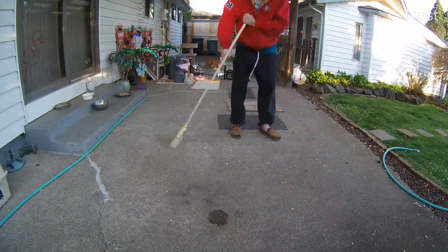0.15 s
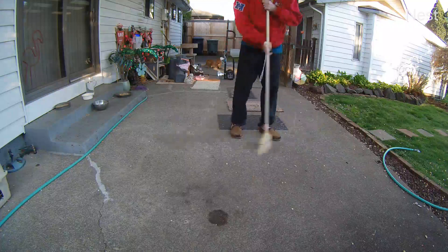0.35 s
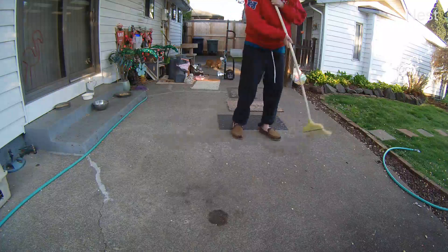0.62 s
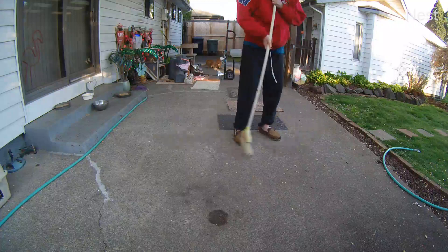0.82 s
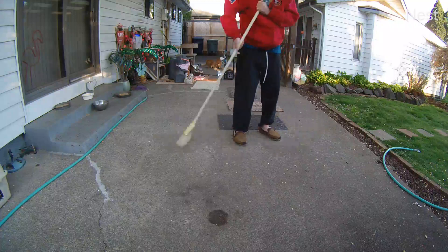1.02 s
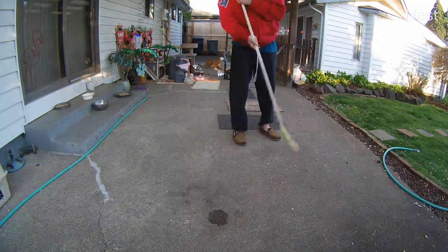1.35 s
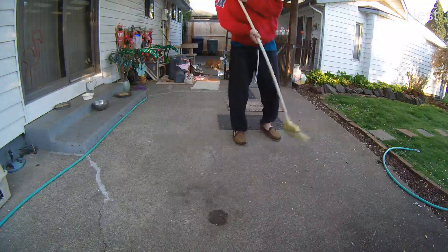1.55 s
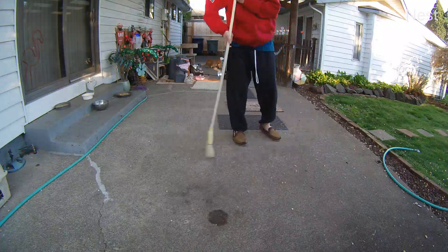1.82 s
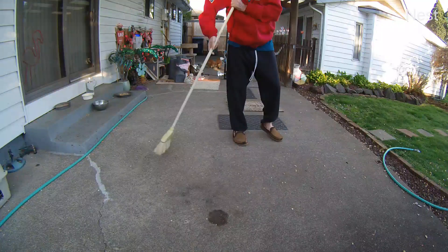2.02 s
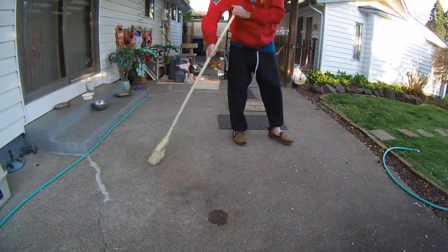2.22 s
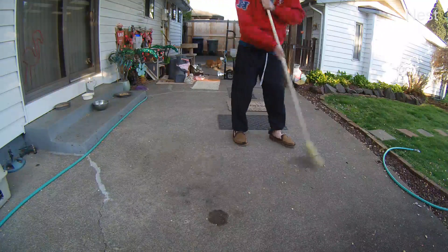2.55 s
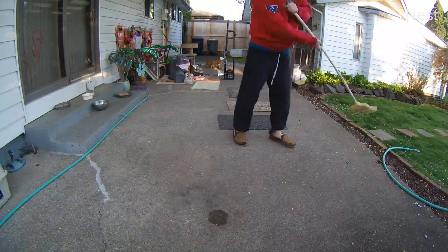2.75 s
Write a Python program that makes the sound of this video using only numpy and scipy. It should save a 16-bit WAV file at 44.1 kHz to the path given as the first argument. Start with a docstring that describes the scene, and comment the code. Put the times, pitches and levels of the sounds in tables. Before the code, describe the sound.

Three raspy broom strokes brush over concrete outdoors, with faint shoe scuffs and ticking grit.

```python
"""Straw broom on a concrete patio

Three strokes, a few metres away. Straws catch and slip on the rough slab, ringing as they flick.
Shoes scuff between strokes and loose grit ticks. House walls add a short echo.
Behind: quiet outdoor air and two faint, hoarse distant calls."""
import sys
import numpy as np
from scipy import signal
from scipy.fft import rfft, irfft
from scipy.io import wavfile
from scipy.ndimage import map_coordinates

SR = 44100
rng = np.random.default_rng(int(sys.argv[2]) if len(sys.argv) > 2 else 0)


def transcribe(signal):
    """Save signal, clipped to [-1, 1], as a 16-bit WAV file at the path in sys.argv[1]."""
    frames = np.atleast_2d(signal).T
    limited = np.clip(frames, -1, 1)
    pcm = np.round(limited * 32767).astype(np.int16)
    wavfile.write(sys.argv[1], SR, pcm)


N = 127890

# Broom strokes. Each row: start, landing, rise and hold in s, first touch in dB below full, full level
# in dB, release in dB/s, body trim in dB, straw ring trim in dB, flex in Hz, hollow ring in dB,
# fine hiss in dB.
STROKES = [(0.189, 0.018, 0.15, 0.11, 14, -29, 245, 2.5, 4, 5400, -18.5, -18),
           (1.249, 0.013, 0.053, 0.08, 20, -33, 335, 6, 2, 5200, -24.5, -26),
           (2.325, 0.035, 0.12, 0.16, 20, -30, 286, 4, 4.5, 5160, -19.5, -21)]

CATCHES_PER_S, CATCH_SPREAD_DB = 9000, 3
JUDDER_HZ, JUDDER_DB = 75.47, 1.01
RING_DB, RING_SCATTER_DB, RING_WANDER_HZ = -1, 1, 9.7
FLEX_DB, FLEX_WIDTH_HZ = -22, 2400
FINE_HZ, FINE_WIDTH_HZ = 7450, 800
BODY_DB, HOLLOW_HZ, HOLLOW_WIDTH_HZ = -16.5, 1064, 58
DENSE_T60_S, DENSE_DB, DENSE_LOW_HZ, DENSE_HIGH_HZ = 0.17, 10, 2000, 8800
SAND_DB, SAND_GROWTH_DB_PER_S = -68.5, 1.5
CALL_JITTER, CALL_JITTER_HZ, CALL_OVERTONE_DB = 0.045, 170, -16
YARD_DB, YARD_T60_S = -13.5, 0.5
AIR_DB, AIR_WAVER_DB = -62, 1.3


def stroke(t, start_s, landing_s, rise_s, hold_s, touch_db, full_db, release_db_per_s,
           body_db, ring_db, flex_hz, hollow_db, fine_db):
    """The broom lands, presses harder, snags and lifts; its force scales tip and body noise."""
    # Straws snag and spring free. Each row: centre in s, half-width in s, force change in dB.
    snags = [(1.332, 0.017, 3), (1.377, 0.0035, 4.5), (2.451, 0.0031, -7), (2.605, 0.028, 1)]
    age = t - start_s
    press_db = -touch_db * (1 - np.clip(age / rise_s, 0, 1)) ** 1.26
    lift_db = -release_db_per_s * np.maximum(age - rise_s - hold_s, 0)
    snag_db = sum(db * np.exp(-((t - at_s) / width_s) ** 2) for at_s, width_s, db in snags)
    force_db = full_db + press_db + lift_db + snag_db + JUDDER_DB * walk(JUDDER_HZ)
    force = np.clip(age / landing_s, 0, 1) * undb(force_db)
    return force * (straw_tips(t, ring_db, flex_hz, fine_db) + broom_body(body_db, hollow_db))


def straw_tips(t, ring_db, flex_hz, fine_db):
    """Tips catch and slip on the slab: rasp, flex, ring and fine hiss; rms 1."""
    # Rasp spectrum. Each row: frequency in Hz, relative level in dB.
    rasp_spectrum = [(120, -43), (380, -44), (600, -17), (1400, -9), (2050, 7), (2400, 1.5), (3000, -3),
                     (3700, -1.5), (4500, -0.5), (5400, -3.5), (6100, -9), (6700, -4.5), (7050, -8.5),
                     (7500, -36.5), (8200, -62), (9000, -22)]
    catches = dense_ringing(clicks(), t)
    rasp = colour(catches, rasp_spectrum)
    flex = colour(ring(catches, flex_hz, FLEX_WIDTH_HZ), rasp_spectrum)
    fine = ring(ring(catches, FINE_HZ, FINE_WIDTH_HZ), FINE_HZ, FINE_WIDTH_HZ)
    straws = undb(RING_DB + ring_db) * straw_ring()
    return unit(rasp + undb(FLEX_DB) * flex + straws + undb(fine_db) * fine)


def straw_ring():
    """Flicked straws ring, each mode driven by its own catches."""
    # Straw resonances. Each row: frequency in Hz, width in Hz, relative level in dB.
    modes = [(2457, 11, -8.5), (3240, 78, -10), (3596, 35, -11), (4330, 12, -4.5), (4730, 47, -3),
             (4600, 18, -13.5), (4775, 8.5, 1.5), (4897, 48, -12), (5006, 16, 1.5), (5206, 45, 2),
             (5310, 120, 6.5), (5583, 22, 0.5), (5870, 25, -4.5), (6220, 54, -2.5), (6456, 45, -3.5),
             (6540, 22, -2.5), (6590, 25, -1)]
    ringing = sum(undb(db + RING_SCATTER_DB * walk(RING_WANDER_HZ)) * ring(clicks(), hz, width_hz)
                  for hz, width_hz, db in modes)
    band = signal.butter(4, [1500, 7000], "band", fs=SR, output="sos")
    return signal.sosfilt(band, unit(ringing))


def broom_body(body_db, hollow_db):
    """The dragging bundle judders and rings hollow."""
    # Body spectrum. Each row: frequency in Hz, relative level in dB.
    spectrum = [(40, -59.5), (130, -46), (300, -41), (430, -25.5), (580, 8.5), (700, 9), (900, 5.5),
                (1065, 10), (1170, 8.5), (1350, 4.5), (1700, 10), (2100, -2), (3500, 6.5), (8000, -36)]
    drag = undb(BODY_DB + body_db + JUDDER_DB * walk(JUDDER_HZ)) * colour(clicks(), spectrum)
    hollow = colour(ring(clicks(), HOLLOW_HZ, HOLLOW_WIDTH_HZ), spectrum)
    return drag + undb(hollow_db) * hollow


def dense_ringing(x, t, count=54):
    """Adds a dense, random ringing colour to the scrape, strongest mid-band, different each time."""
    age = t[t < DENSE_T60_S]
    offset, phase = rng.random((count, 2)).T
    place = (np.arange(count) + 2 * offset) / (count + 1)
    hz = DENSE_LOW_HZ + (DENSE_HIGH_HZ - DENSE_LOW_HZ) * place
    weights = np.sqrt(np.sin(np.pi * place))
    tones = weights @ np.sin(2 * np.pi * (hz[:, None] * age + phase[:, None]))
    rung = signal.fftconvolve(x, tones * undb(-60 * age / DENSE_T60_S))[:N]
    return x + undb(DENSE_DB) * unit(rung)


def slap(t):
    """The straw tips hit the slab together with a bright crunch."""
    # Tip strikes. Each row: start in s, level in dB, decay in s.
    strikes = [(1.278, -34.5, 0.011)]
    # Crunch spectrum. Each row: frequency in Hz, relative level in dB.
    spectrum = [(300, -27.5), (900, -20), (3000, 0), (4500, 1), (5500, 6), (6800, 2.5), (7700, -17),
                (9000, -32)]
    return sum(undb(db) * burst(t - start_s, 0.002, 0, decay_s) * colour(clicks(), spectrum)
               for start_s, db, decay_s in strikes)


def shoe_scuffs(t):
    """A sole lands with a soft thud, slides briefly and grinds the grit under it."""
    # Scuffs. Each row: start in s, level in dB, hold in s, decay in s, relative grit and thud in dB.
    scuffs = [(0.056, -43, 0.011, 0.029, 0, -15.5), (0.676, -60.5, 0.0075, 0.033, 1.5, -8),
              (0.823, -47, 0.021, 0.04, -3.5, 0)]
    # Spectra of sole on concrete and of grit. Each row: frequency in Hz, relative level in dB.
    sole_spectrum = [(60, -40), (150, -30), (280, 1.5), (480, 4), (650, 8.5), (900, 3.5), (1200, 4.5),
                     (1700, 4.5), (2250, 3.5), (3200, 0.5), (7000, -37)]
    grit_spectrum = [(150, -35), (800, -14), (2500, -11), (3300, -0.5), (3900, 0.5), (5400, 1.5),
                     (6000, -4.5), (7000, -12.5), (8500, -51)]
    attack_s, thud_lag_s = 0.01, 0.013
    shoes = np.zeros(N)
    for start_s, db, hold_s, decay_s, grit_db, thud_db in scuffs:
        age = t - start_s
        sole = colour(clicks(), sole_spectrum)
        grit = colour(dense_ringing(clicks(), t), grit_spectrum)
        slide = burst(age, attack_s, hold_s, decay_s) * (sole + undb(grit_db) * grit)
        thud = colour(ring(rng.standard_normal(N), hz=500, width_hz=96), sole_spectrum)
        thud *= burst(age - thud_lag_s, attack_s=0.0081, hold_s=0, decay_s=0.034)
        shoes += undb(db) * (slide + undb(thud_db) * thud)
    return shoes


def loose_grit(t):
    """Grit ticks brightly; swept sand skitters from the first stroke on, slowly growing louder."""
    # Grit ticks. Each row: start in s, attack in s, level in dB, decay in s.
    ticks = [(.97, 0.02, -58, 0.053), (1.062, 0.004, -63, 0.05), (1.561, 0.0076, -47, 0.0098),
             (1.577, .003, -57, 0.016), (1.597, 0.0017, -62, 0.0024), (1.828, .002, -70, 0.0037),
             (1.903, 0.0026, -54.5, 0.049), (2.07, 0.0094, -72, 0.013), (2.84, 0.0043, -55.5, 0.021),
             (2.854, 0.0028, -54.5, 0.0062)]
    # Spectra of ticks and of sand. Each row: frequency in Hz, relative level in dB.
    tick_spectrum = [(150, -43), (800, -19), (3000, 1), (4500, 9.5), (5400, 16), (6700, 9.5), (7600, -5),
                     (9000, -25)]
    sand_spectrum = [(200, -44.5), (1500, -11.5), (3000, -5), (4400, 1.5), (5400, 0.5), (6700, -6),
                     (7500, -30), (9000, -51)]
    tick_gain = sum(undb(db) * burst(t - start_s, attack_s, 0, decay_s)
                    for start_s, attack_s, db, decay_s in ticks)
    first_s, _, rise_s, *_ = STROKES[0]
    sand_age = t - first_s - rise_s
    sand_gain = (sand_age > 0) * undb(SAND_DB + SAND_GROWTH_DB_PER_S * sand_age)
    sand = colour(clicks(per_s=840), sand_spectrum)
    return sand_gain * sand + tick_gain * colour(clicks(), tick_spectrum)


def far_calls(t):
    """Short, unsteady notes with a hoarse edge: one nearly level, one falling."""
    # Calls. Each row: start, attack, hold and decay in s, level in dB, pitch in Hz, fall in Hz/s,
    # relative hoarseness in dB.
    calls = [(-0.02, 0.011, 0.049, 0.0093, -54, 953, 14, -0.5),
             (2.166, 0.0772, 0.045, 0.084, -55.5, 982, 904, 3.5)]
    # Hoarse spectrum. Each row: frequency in Hz, relative level in dB.
    spectrum = [(300, -40), (700, -6), (920, 3.5), (1250, -12), (1550, 1.5), (1850, -0.5), (2200, -15.5),
                (2750, -7), (3400, -23), (6000, -42)]
    voices = np.zeros(N)
    for start_s, attack_s, hold_s, decay_s, db, hz, fall_hz_per_s, hoarse_db in calls:
        age = t - start_s
        glide_hz = hz - fall_hz_per_s * np.clip(age, 0, attack_s + hold_s)
        pitch_hz = glide_hz * (1 + CALL_JITTER * walk(CALL_JITTER_HZ))
        phase = 2 * np.pi * np.cumsum(pitch_hz) / SR
        note = unit(np.sin(phase) + undb(CALL_OVERTONE_DB) * np.sin(2 * phase))
        hoarse = colour(rng.standard_normal(N) * (1 + np.cos(phase)), spectrum)
        voices += undb(db) * burst(age, attack_s, hold_s, decay_s) * (note + undb(hoarse_db) * hoarse)
    return voices


def yard(x, t):
    """Adds echoes from the house walls and a short diffuse tail."""
    # Wall echoes. Each row: delay in s, gain in dB.
    walls = [(.0092, -11), (.021, -8.5), (.044, -44)]
    tail = rng.standard_normal(N) * undb(-60 * t / YARD_T60_S) * np.minimum(t / 0.02, 1)
    response = undb(YARD_DB) * tail / np.sqrt(np.sum(tail ** 2))
    for delay_s, db in walls:
        response[int(delay_s * SR)] += undb(db)
    return x + signal.fftconvolve(x, response)[:N]


def outdoor_air():
    """Quiet background noise, wavering slightly in level."""
    # Background spectrum. Each row: frequency in Hz, relative level in dB.
    spectrum = [(30, -44.5), (90, -30), (135, -9), (175, -15), (260, -5), (450, -3), (750, 4.5),
                (1150, 5.5), (1600, 1), (2500, -8), (3500, -19.5), (5200, -6), (6700, -33.5), (7300, -38.5),
                (9000, -46.5)]
    return colour(rng.standard_normal(N), spectrum) * undb(AIR_DB - AIR_WAVER_DB * walk(hz=11))


def undb(db):
    return 10 ** (np.asarray(db) / 20)


def unit(x):
    """Scale to rms 1."""
    return x / np.sqrt(np.mean(x ** 2))


def walk(hz):
    """Smooth random wander, spread near 1."""
    points = rng.standard_normal(2048)
    return map_coordinates(points, [np.arange(N) / SR * hz], order=2, mode="mirror")


def colour(x, points):
    """Filter by (Hz, dB) points; rms 1."""
    hz, db = np.array(points, float).T
    bin_hz = np.maximum(np.arange(N // 2 + 1) * SR / N, 1)
    gain = undb(np.interp(np.log(bin_hz), np.log(hz), db))
    return unit(irfft(rfft(x) * gain, N))


def ring(x, hz, width_hz):
    """One decaying resonance; rms 1."""
    pole = np.exp((2j * np.pi * hz - np.pi * width_hz) / SR)
    return unit(signal.lfilter([1], [1, -pole], x).imag)


def clicks(per_s=CATCHES_PER_S):
    """Random tiny impacts, most weak, a few strong; rms 1."""
    size = undb(CATCH_SPREAD_DB * np.minimum(rng.exponential(size=N), 4))
    return unit((rng.random(N) < per_s / SR) * size * rng.choice([-1, 1], N))


def burst(age, attack_s, hold_s, decay_s):
    """Linear attack, hold, exponential release."""
    return np.clip(age / attack_s, 0, 1) * np.exp(-np.maximum(age - attack_s - hold_s, 0) / decay_s)


def scene():
    """Broom, shoes, grit and distant calls in the yard, over outdoor air; mono."""
    t = np.arange(N) / SR
    sweeps = sum(stroke(t, *row) for row in STROKES)
    near = sweeps + shoe_scuffs(t) + loose_grit(t) + slap(t)
    return (yard(near + far_calls(t), t) + outdoor_air())[None]


def record(dry):
    """The microphone cuts the top."""
    top_hz = 8850
    return signal.sosfilt(signal.ellip(10, 0.2, 80, top_hz, fs=SR, output="sos"), dry)


dry = scene()
out = record(dry)
transcribe(out)
```